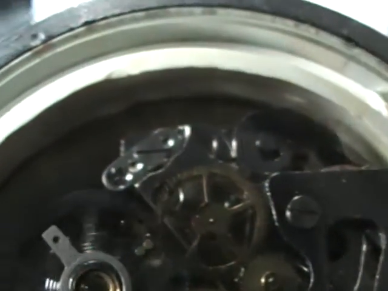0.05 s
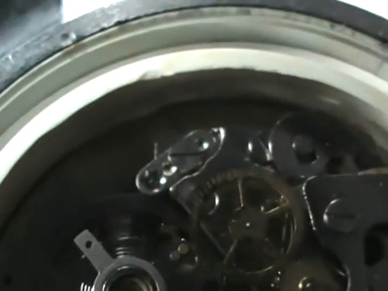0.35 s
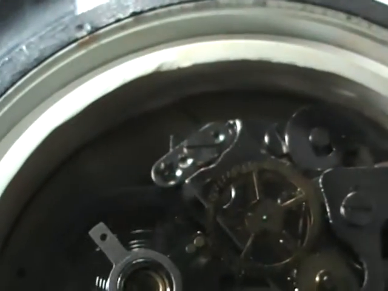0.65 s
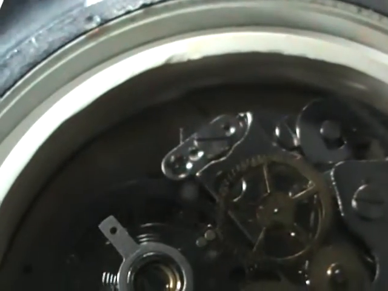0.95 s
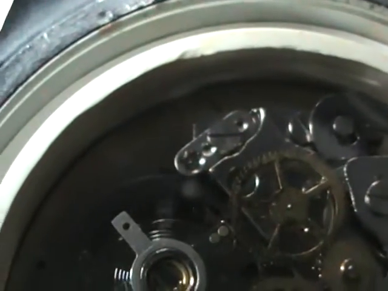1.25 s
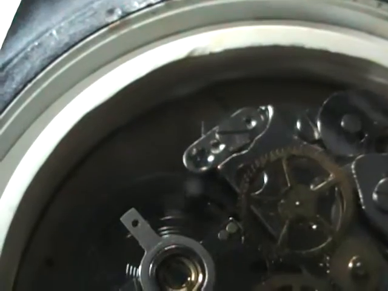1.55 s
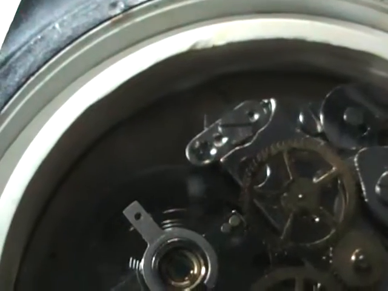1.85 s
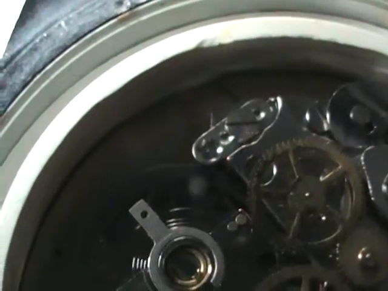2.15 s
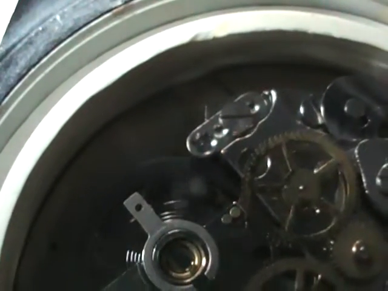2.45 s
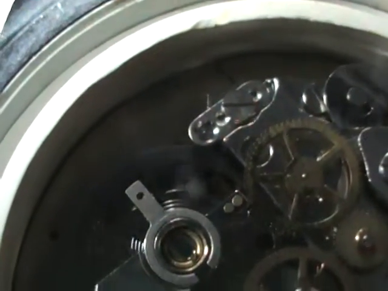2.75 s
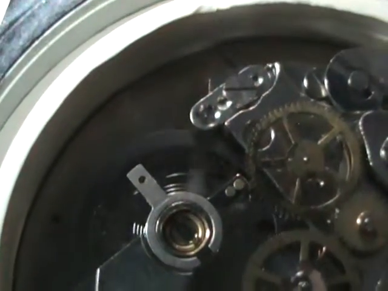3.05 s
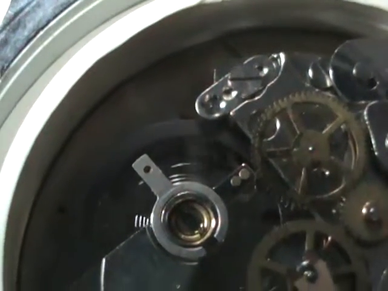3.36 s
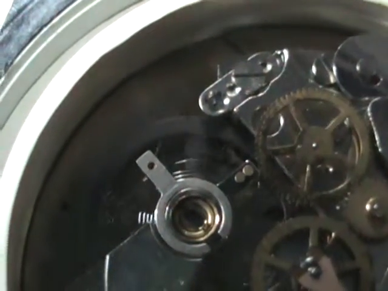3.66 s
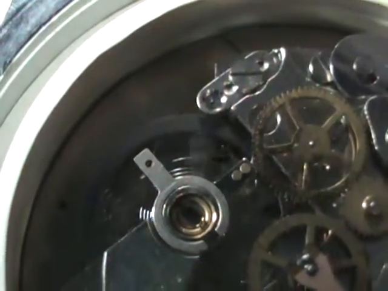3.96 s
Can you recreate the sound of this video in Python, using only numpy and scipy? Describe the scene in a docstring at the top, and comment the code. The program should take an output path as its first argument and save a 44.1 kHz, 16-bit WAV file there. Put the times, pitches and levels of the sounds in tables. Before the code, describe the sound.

An open mechanical watch ticks sharply and quickly from start to end, heard up close and a little to the right. Behind it lie a quiet room's soft fan hum and hiss, with barely audible hand rubs on the case.

```python
"""A mechanical watch ticks five times a second, close by and slightly to the right, in a quiet room.
Each beat is three tiny steel impacts: the pallet fork unlocks, the escape wheel gives its impulse,
and a tooth drops on the other pallet. Tick and tock excite the modes of the open movement differently.
A hand rubs faintly on the case. Behind it are mains hum, fan tones, a thin electronic whine,
a fluttering motor whirr, ventilation rumble and hiss."""
import sys
import numpy as np
from scipy import signal
from scipy.fft import rfft, irfft
from scipy.io import wavfile
from scipy.ndimage import uniform_filter1d

SR = 44100
rng = np.random.default_rng(int(sys.argv[2]) if len(sys.argv) > 2 else 0)


def transcribe(signal):
    """Save signal, clipped to [-1, 1], as a 16-bit WAV file at the path in sys.argv[1]."""
    frames = np.atleast_2d(signal).T
    limited = np.clip(frames, -1, 1)
    pcm = np.round(limited * 32767).astype(np.int16)
    wavfile.write(sys.argv[1], SR, pcm)


N = 176400

# Normal modes of the movement, and how strongly blows on the fork and tooth drops excite them:
# pitch_hz, t60_s, fork_tick_db, fork_tock_db, drop_tick_db, drop_tock_db
MODES = [ (4620, .013, -14, -7.5, -35, -28), (4850, .013, -12, -5.5, -34, -28),
         (6050, .009, -9, -17, -36, -32), (7200, .005, -8, -13, -16.5, -26.5),
         (7485, .055, -26, -22, -22, -17), (10000, .006, -11, -15, -18, -18),
         (10355, .045, -25, -24, -23, -18.5), (11150, .0062, -5, -2, -4, -5.5),
         (11620, .005, -8, -7, -5, -7), (12260, .0072, -3, 0, -1, 1.5), (13280, .008, 1.5, -5, -9, -7.5),
         (13700, .006, -4, -7, -8, -6), (14500, .0035, -2, -2.5, -6, -8),
         (15450, .004, -7.5, -8.5, -16, -15)]


def watch(t):
    """Escapement: each swing of the balance sets off three impacts, on unlocking, impulse and drop."""
    # Beats, tick and tock in turn: drop_time_s, unlock_db, impulse_db, drop_db
    beats = [(0.0543, -53.5, -46, -34), (0.2561, -54.9, -47.1, -33.5), (0.4562, -50.5, -46.9, -39),
             (0.6587, -57, -49.5, -36.0), (0.8588, -52.6, -47.5, -38.5), (1.0609, -57, -46.5, -35),
             (1.2611, -53, -48, -35.2), (1.4631, -55, -48.5, -35.5), (1.6629, -51.8, -50, -39.5),
             (1.8656, -55.9, -48.5, -41), (2.0652, -60.3, -45.5, -37.5), (2.2671, -53.7, -48.8, -37.5),
             (2.4665, -56.0, -49, -39.5), (2.6686, -54, -50, -37.5), (2.8682, -57.5, -49.7, -40.5),
             (3.0702, -56, -48, -39.5), (3.2691, -56, -49, -39.5), (3.4711, -55.5, -53, -37.5),
             (3.6707, -55, -52, -43.5), (3.8723, -55, -52.2, -40.5)]
    # Interval from unlocking to drop, shorter when the balance swings faster: time_s, lift_s
    lift_times = [(0, .0434), (1.1, .0442), (2.3, .0428), (3.9, .0406)]
    # The three impacts: gain_db, rise_s, scrape_db, scrape_t60_s, rebound_s, rebound_db
    unlock = (1.5, .0004, -4, .007, .0006, -4)
    impulse = (1, .0004, -5, .011, .0014, -4)
    drop = (.3, .00036, -11, .0068, .0006, -3.5)
    # Level difference between the ears: frequency_hz, left_minus_right_db
    pan = [(4700, -8.5), (7400, -4.4), (10200, -4.6), (12300, -4.3), (13500, -4.5), (14500, 2), (16000, .5)]
    impulse_lead = .708  # share of the lift time left at the impulse
    pan_db_per_s = -1  # the watch slides to the right
    ticks = np.zeros(N)
    _, _, fork_tick, fork_tock, drop_tick, drop_tock = np.array(MODES).T
    for k, (drop_time_s, unlock_db, impulse_db, drop_db) in enumerate(beats):
        fork_modes, drop_modes = (fork_tock, drop_tock) if k % 2 else (fork_tick, drop_tick)
        lift_s = np.interp(drop_time_s, *np.array(lift_times).T)
        add(ticks, drop_time_s - lift_s, undb(unlock_db) * steel_impact(unlock, fork_modes))
        add(ticks, drop_time_s - lift_s * impulse_lead, undb(impulse_db) * steel_impact(impulse, fork_modes))
        add(ticks, drop_time_s, undb(drop_db) * steel_impact(drop, drop_modes))
    drift_db = pan_db_per_s * (t - t.mean())
    return np.array([colour(ticks, [(hz, share * db) for hz, db in pan]) * undb(share * drift_db)
                     for share in (.5, -.5)])


def steel_impact(kind, mode_levels_db):
    """Damped free vibration: a blow and its rebound ring the modes, over a short scrape of friction."""
    # Spectrum of steel scraping on steel: frequency_hz, level_db
    scrape_spectrum = [(1500, -34), (3500, -22), (6000, -16), (8200, -14), (9500, -9), (11500, 1.5),
                       (14000, 0), (16000, -9), (17000, -18)]
    gain_db, rise_s, scrape_db, scrape_t60_s, rebound_s, rebound_db = kind
    scatter_db, detune = 1.2, .002
    t = np.arange(2400) / SR
    rebound_delay_s = rebound_s * (.5 + rng.random())

    def envelope(delay_s, t60_s):
        onset = np.sin(np.pi / 2 * np.clip((t - delay_s) / rise_s, 0, 1)) ** 2
        return onset * fade(t - delay_s, t60_s)

    ring = 0
    for (pitch_hz, t60_s, *_), level_db in zip(MODES, mode_levels_db):
        phase = 2 * np.pi * pitch_hz * (1 + detune * rng.standard_normal()) * t
        gain = undb(level_db + scatter_db * rng.standard_normal())
        blow = envelope(0, t60_s) * np.sin(phase + 2 * np.pi * rng.random())
        rebound = envelope(rebound_delay_s, t60_s) * np.sin(phase + 2 * np.pi * rng.random())
        ring = ring + gain * unit_energy(blow + undb(rebound_db) * rebound)
    scrape = colour(rng.standard_normal(len(t)), scrape_spectrum) * envelope(0, scrape_t60_s)
    click = unit_energy(ring) + undb(scrape_db) * unit_energy(scrape)
    click = unit_energy(click) * np.sqrt(.005 * SR)  # the energy of 5 ms at rms 1
    return undb(gain_db) * click


def hand_rubs():
    """Sliding friction: a hand on the case makes soft swells of noise."""
    # Strokes of the hand: start_s, length_s, level_db
    strokes = [(1.073, .02, -63), (2.93, .15, -64), (3.81, .1, -66)]
    # Spectrum of the friction: frequency_hz, level_db
    friction_spectrum = [(300, -20), (900, -3), (1600, 0), (2600, -3), (4500, -9), (8000, -15),
                         (15000, -30)]
    out = np.zeros(N)
    for start_s, length_s, level_db in strokes:
        friction = colour(rng.standard_normal(N), friction_spectrum)[:int(length_s * SR)]
        swell = np.sqrt(np.hanning(len(friction)))
        add(out, start_s, undb(level_db) * friction / friction.std() * swell)
    return out


def hum(t):
    """Periodic vibration: mains, fan and electronics give a line spectrum that wavers a little."""
    # Steady tones: pitch_hz, level_db, channel_phase_difference_rad
    tones = [(58.5, -67, 0), (119.9, -60.7, .1), (203.6, -58.7, .15), (403.6, -72, .5), (473, -76.5, .6),
             (1188.3, -70, .7), (1366.4, -78, 1), (1425.9, -71.5, .8), (1485.5, -82, 1), (2352.8, -85, 1),
             (15734, -77, .5)]
    waver_db, wander_rad = 1.5, .3
    out = 0
    for pitch_hz, level_db, apart_rad in tones:
        phase = 2 * np.pi * (pitch_hz * t + rng.random()) + wander_rad * drift(rate_hz=3)
        amplitude = np.sqrt(2) * undb(level_db + waver_db * drift(rate_hz=4))
        out = out + amplitude * np.sin(phase + np.array([[apart_rad], [-apart_rad]]) / 2)
    return out


def motor_whirr(t):
    """Amplitude modulation: a narrow band of motor noise flutters at a slightly unsteady rate."""
    # Spectrum of the motor: frequency_hz, level_db
    motor_spectrum = [(1500, -30), (2100, -8), (2220, 0), (2620, -1), (2800, -16), (4000, -35)]
    level_db, flutter_hz, flutter_db = -78, 14.2, 5
    band = colour(rng.standard_normal(N), motor_spectrum)
    flutter = np.sin(2 * np.pi * flutter_hz * t + .5 * drift(rate_hz=2))
    return band / band.std() * undb(level_db + flutter_db * flutter)


def room_air():
    """Partly coherent noise: ventilation rumble alike in both ears, a wide midrange and smooth hiss."""
    # Spectral density of what the channels share and of their difference: frequency_hz, mid_db, side_db
    air_spectrum = [(20, -8, -41), (36, 2, -28), (56, -1, -27), (78, -3.5, -26), (100, 0, -21),
                    (170, -1, -17.5), (300, -1.8, -11), (480, -8, -10.5), (800, -10.4, -13),
                    (1300, -15.7, -17), (1900, -19.5, -18.5), (2350, -21.5, -19.5), (3000, -22.3, -22.5),
                    (6000, -23.4, -27.5), (10000, -24.5, -31), (15700, -23.7, -34)]
    mid_level_db, waver_db, hiss_top_hz = -54.2, .5, 15850
    mid = colour(rng.standard_normal(N), air_spectrum, column=1)
    side = colour(rng.standard_normal(N), air_spectrum, column=2)
    gain = undb(mid_level_db + waver_db * drift(rate_hz=5))
    stereo = np.array([mid + side, mid - side]) / mid.std() * gain
    passband = np.fft.rfftfreq(N, 1 / SR) < hiss_top_hz
    return irfft(rfft(stereo) * passband, N)


def undb(db):
    """Decibels to amplitude ratio."""
    return 10 ** (np.asarray(db) / 20)


def unit_energy(x):
    """Scale so that the squared samples sum to 1."""
    return x / np.sqrt(np.sum(x ** 2))


def fade(t, t60_s):
    """Exponential decay, by 60 dB in t60_s."""
    return np.exp(-np.log(1000) * t / t60_s)


def colour(x, spectrum, column=1):
    """Spectral shaping by one decibel column of a table, interpolated over log frequency."""
    points = np.array(spectrum)
    frequency_hz = np.fft.rfftfreq(len(x), 1 / SR)
    gain_db = np.interp(np.log(frequency_hz + 1), np.log(points[:, 0]), points[:, column])
    return irfft(rfft(x) * undb(gain_db), len(x))


def drift(rate_hz):
    """Random steps smoothed into a slow fluctuation with a standard deviation of 1."""
    hold = int(SR / rate_hz)
    steps = np.repeat(rng.standard_normal(N // hold + 2), hold)
    smooth = uniform_filter1d(uniform_filter1d(steps, hold), hold)[:N]
    return smooth / smooth.std()


def add(out, start_s, x):
    """Mix x into out from start_s on."""
    i = max(int(start_s * SR), 0)
    out[i:i + len(x)] += x[:max(N - i, 0)]


def scene():
    """Superposition: the watch and the sounds of the room add in pressure."""
    t = np.arange(N) / SR
    return watch(t) + hand_rubs() + hum(t) + motor_whirr(t) + room_air()


def record(dry):
    """Band limiting: a steep elliptic low-pass filter removes the highest treble."""
    cutoff_hz = 16600
    return signal.sosfilt(signal.ellip(8, .2, 70, cutoff_hz, fs=SR, output="sos"), dry)


dry = scene()
out = record(dry)
transcribe(out)
```